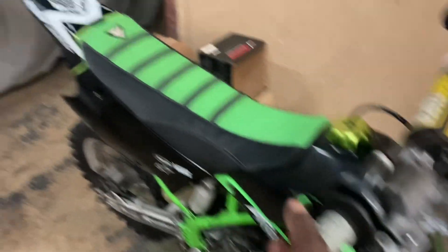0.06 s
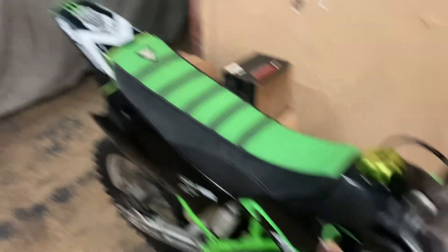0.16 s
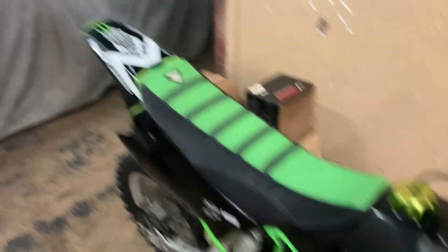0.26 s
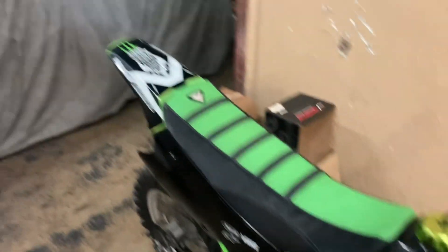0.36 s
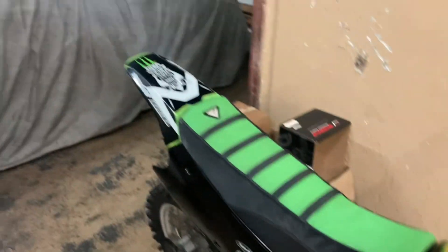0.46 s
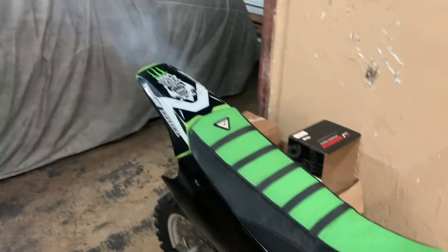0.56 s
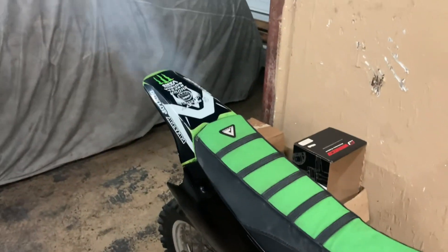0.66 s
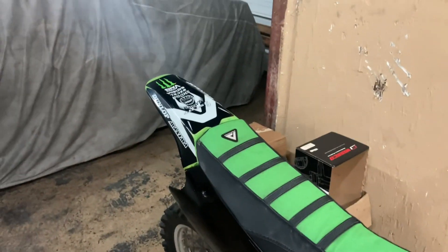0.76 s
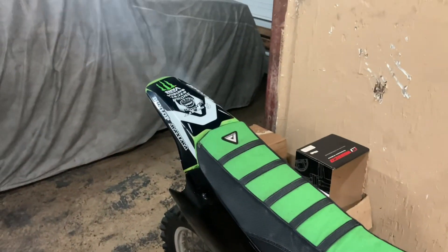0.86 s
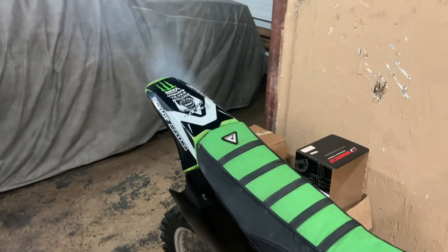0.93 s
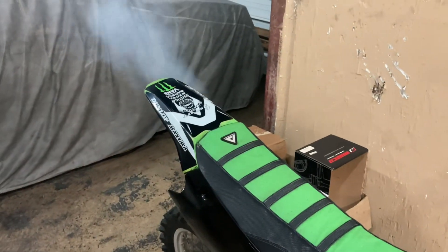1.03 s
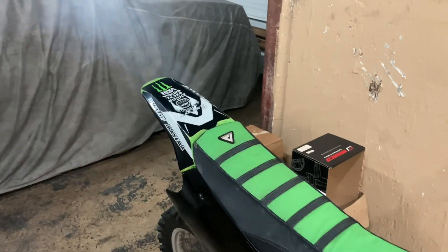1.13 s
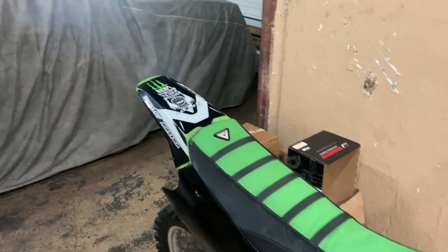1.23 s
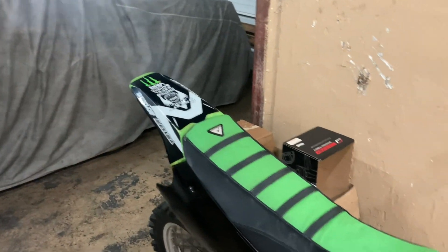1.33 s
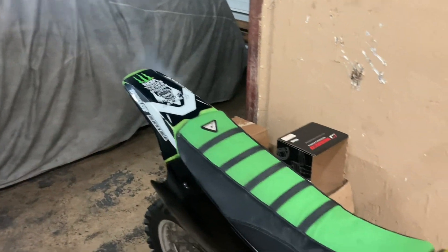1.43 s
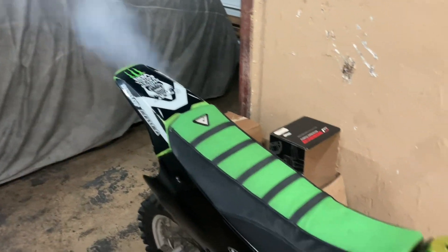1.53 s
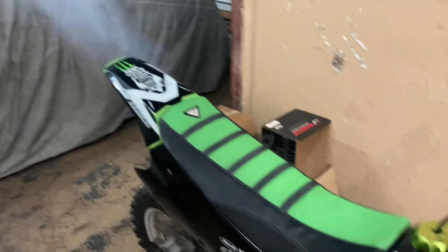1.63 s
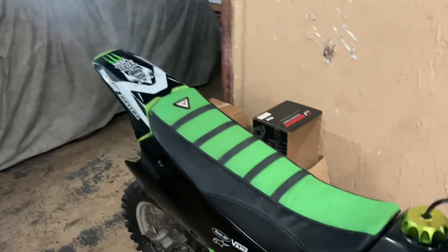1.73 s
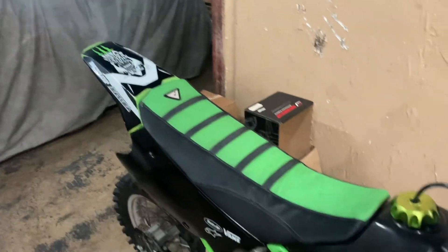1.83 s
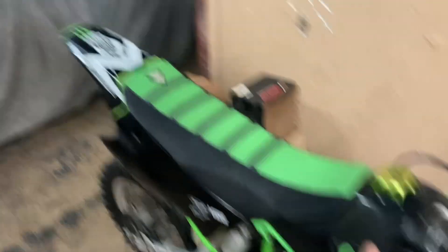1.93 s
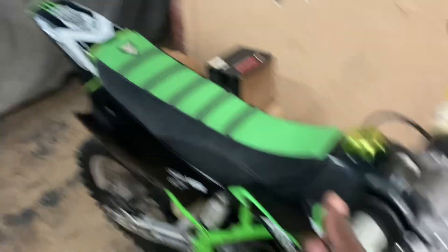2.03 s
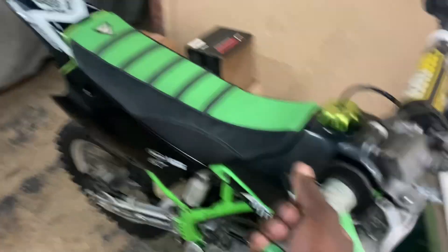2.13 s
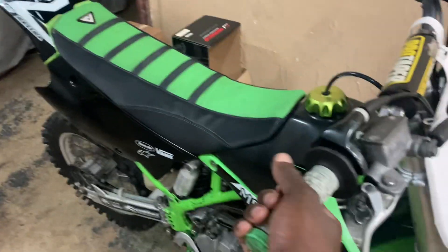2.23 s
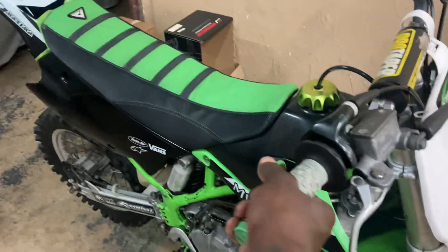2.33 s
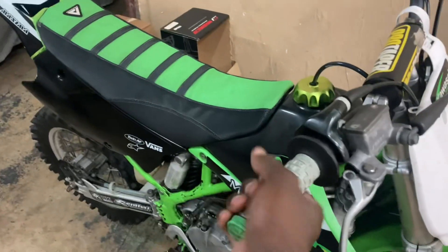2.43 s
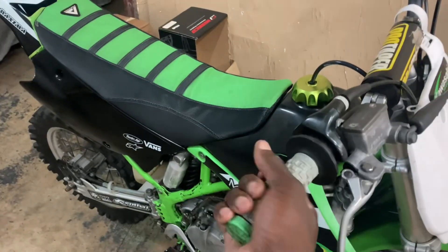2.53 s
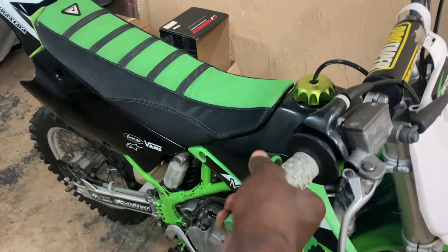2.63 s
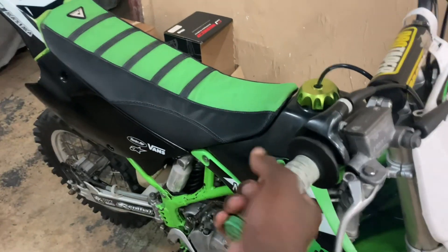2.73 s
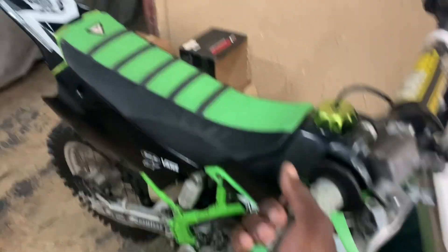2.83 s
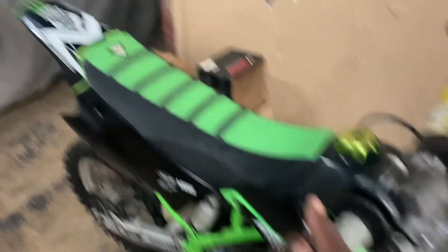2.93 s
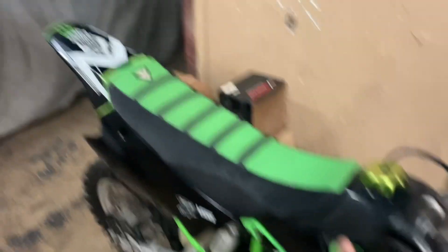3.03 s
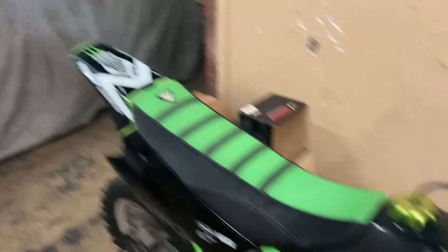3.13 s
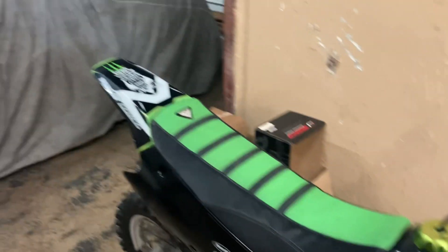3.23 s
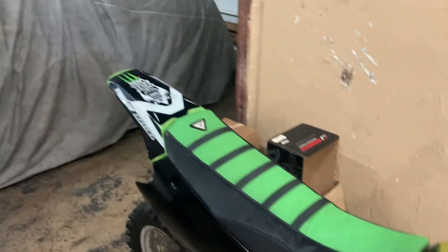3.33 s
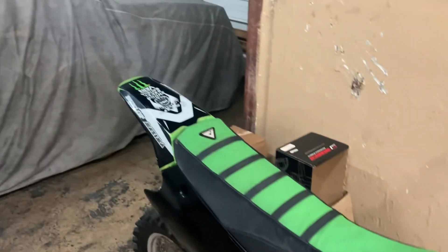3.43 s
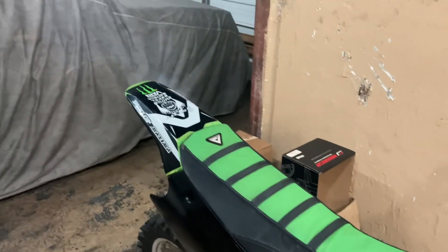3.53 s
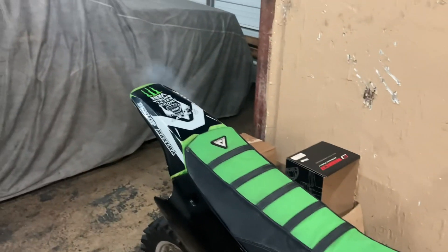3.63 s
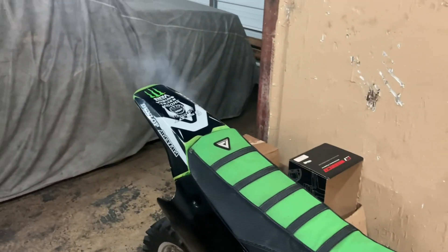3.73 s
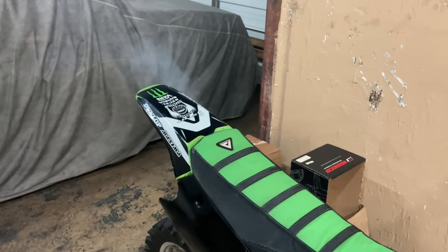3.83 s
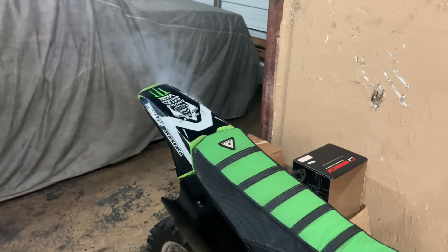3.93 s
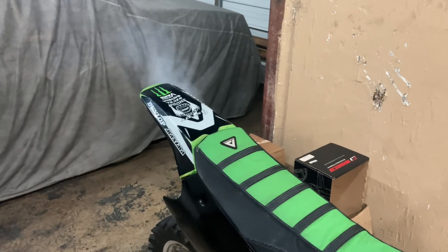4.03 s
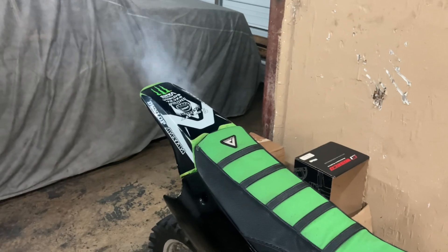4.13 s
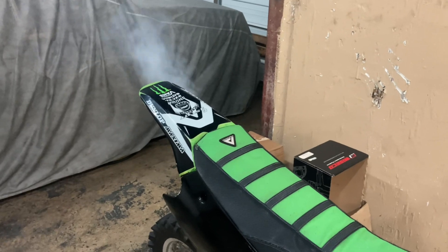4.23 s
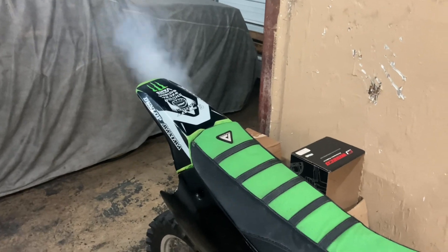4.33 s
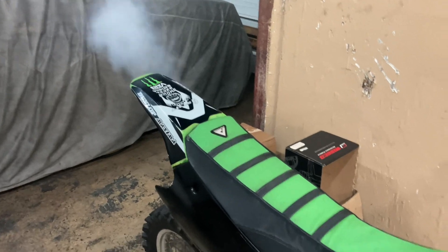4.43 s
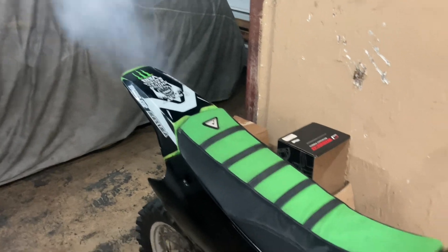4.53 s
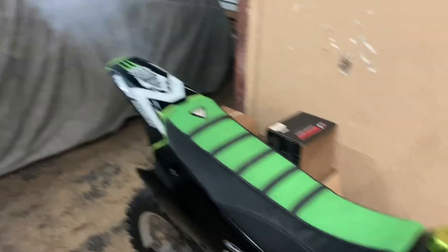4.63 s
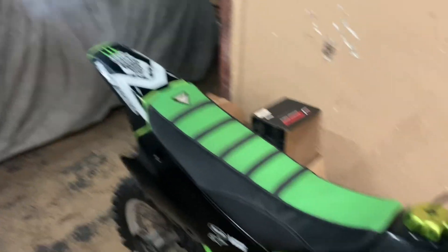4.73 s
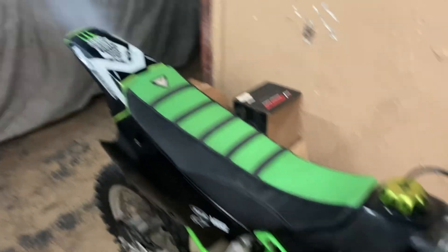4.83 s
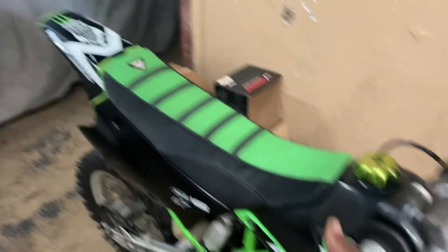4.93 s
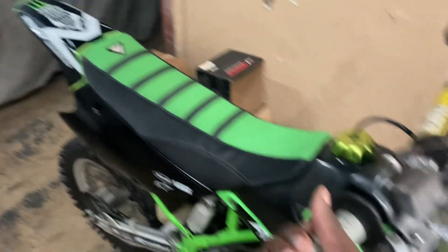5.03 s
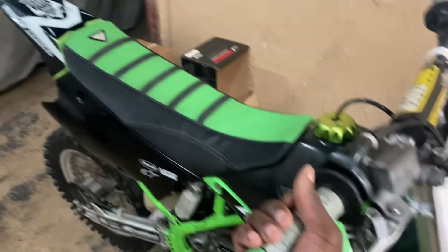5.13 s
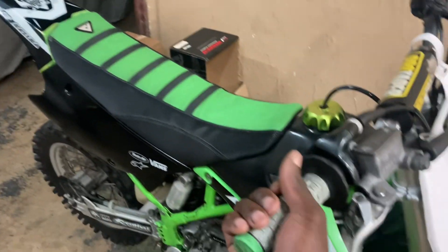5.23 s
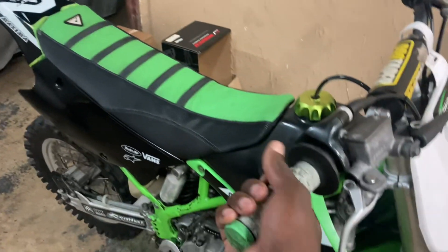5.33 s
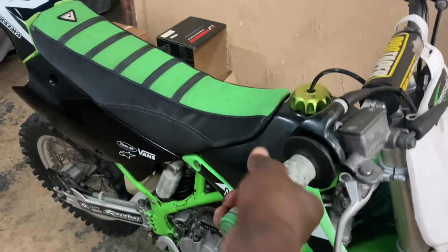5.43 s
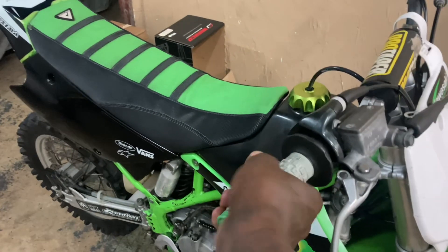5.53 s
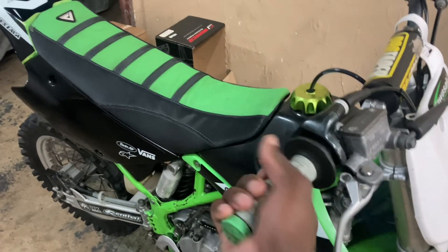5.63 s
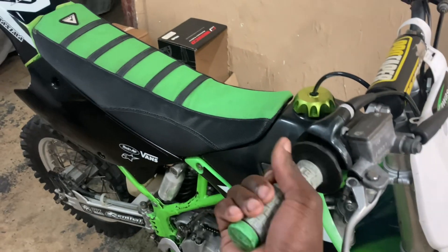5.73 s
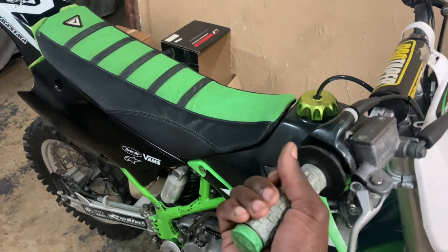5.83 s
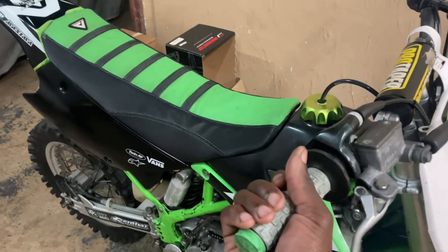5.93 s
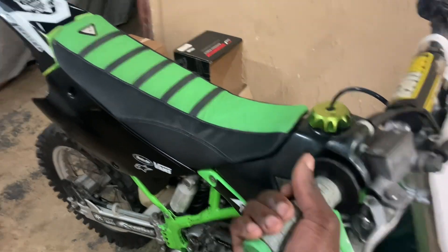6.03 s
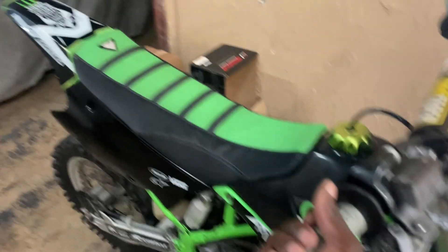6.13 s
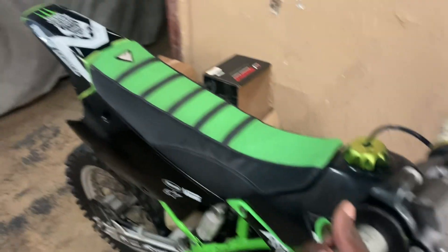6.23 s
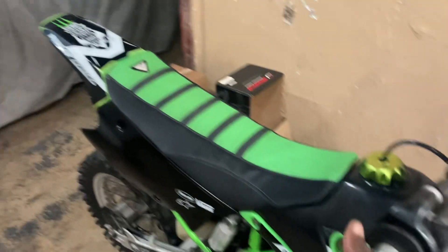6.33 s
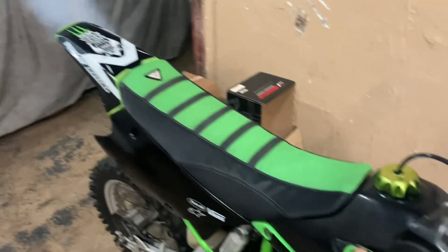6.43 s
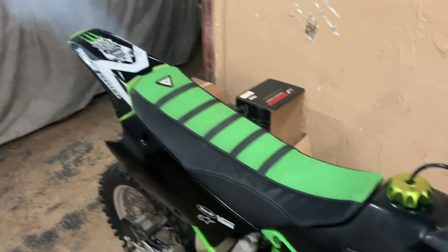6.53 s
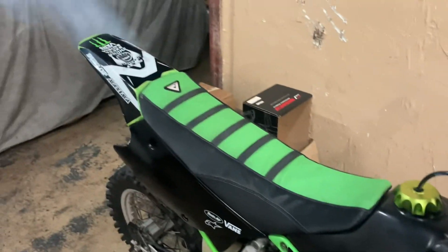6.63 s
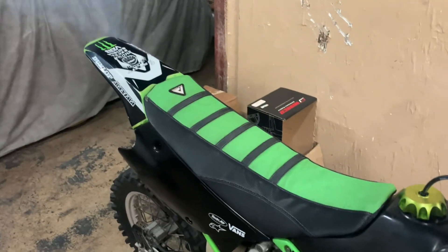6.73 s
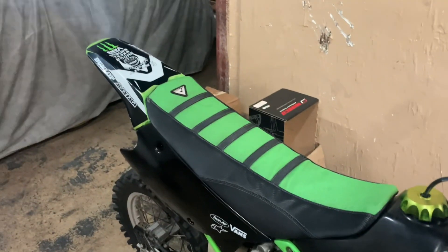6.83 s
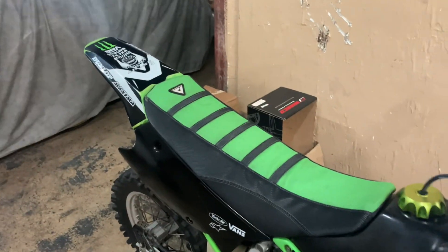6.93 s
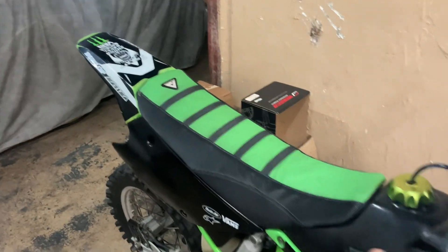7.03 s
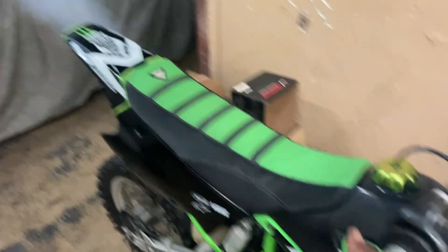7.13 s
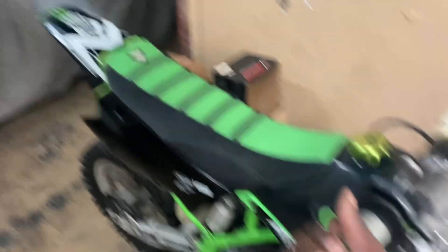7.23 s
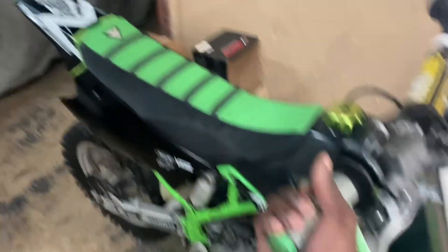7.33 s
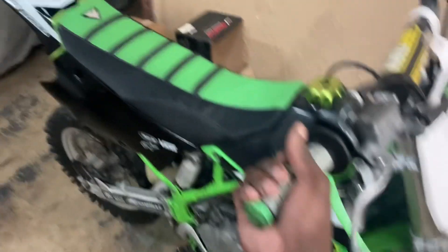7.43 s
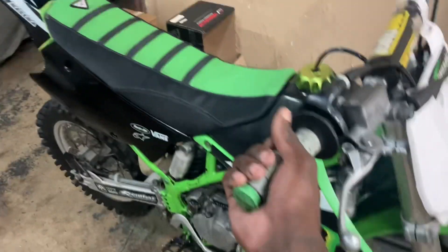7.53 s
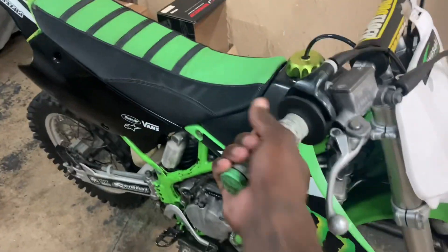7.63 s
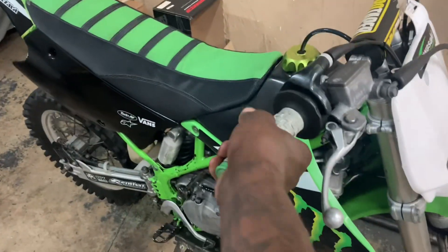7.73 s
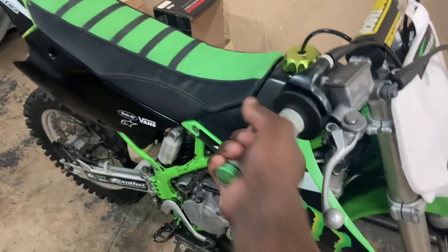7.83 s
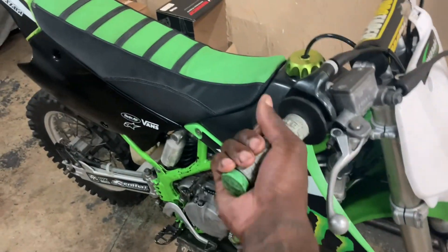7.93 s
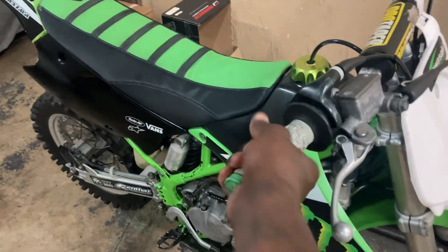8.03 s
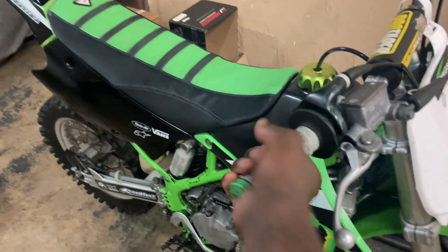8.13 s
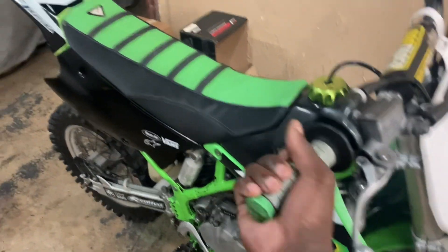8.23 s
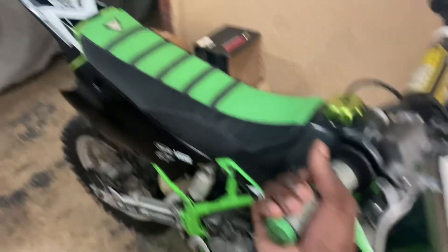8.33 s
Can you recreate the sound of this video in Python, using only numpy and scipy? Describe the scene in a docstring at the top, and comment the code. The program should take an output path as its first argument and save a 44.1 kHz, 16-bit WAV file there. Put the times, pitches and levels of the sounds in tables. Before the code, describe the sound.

A small two-stroke dirt bike engine picks up from slow puttering and is revved in sharp, raspy throttle blips inside a garage, heard up close.

```python
"""Small two-stroke dirt bike revved in a garage

The engine picks up from a slow beat and is blipped fifteen times, coasting down between blips.
Throttle open: firing pulses boom in the pipe, gas barks in the chamber and a noise jet rasps.
Throttle shut: the bark comes in uneven putts while crank overtones whine and knocked metal clatters.
A camera's microphones stand close by; the garage walls answer as short decaying noise tails."""
import sys
import numpy as np
from scipy import signal
from scipy.fft import rfft, irfft, next_fast_len
from scipy.io import wavfile
from scipy.ndimage import uniform_filter1d, map_coordinates

SR = 44100
rng = np.random.default_rng(int(sys.argv[2]) if len(sys.argv) > 2 else 0)


def generate_wav(sig):
    """Save sig (samples, or channels by samples) to the path in sys.argv[1] as 16-bit PCM at SR."""
    pcm = np.round(np.clip(np.atleast_2d(sig).T, -1, 1) * 32767).astype(np.int16)
    wavfile.write(sys.argv[1], SR, pcm)


N = 369116

# Twists of the throttle. Each row: opening time in seconds, time held in seconds, run-up in seconds,
# top speed in crank turns a second, hang at the top in seconds, ease (0 is snapped, more is rolled on),
# then peak levels in dB, before scene() trims them: boom, bark, rasp, clatter.
THROTTLE_TWISTS = [(-.03, 0.057, .11, 38.13, 0.012, 0, -18, -24.5, -42, -26.5),
                   (.075, .1, .11, 44.02, .01, 0.11, -9, -25, -27, -19.5),
                   (.19, 0.13, .13, 81.95, .05, 0, -14.5, -25.5, -26, -24),
                   (.497, 0.16, 0.15, 107.3, 0.12, 0, -12, -26.5, -22, -24),
                   (.917, 0.12, .147, 137.5, .024, 0, -13, -27.5, -20.5, -24.5),
                   (1.445, 0.14, 0.22, 168.7, .008, 0, -12.5, -25.5, -20, -23),
                   (2.297, 0.16, 0.21, 153.2, 0.012, 0.15, -16.5, -26.5, -22, -24),
                   (2.652, 0.073, 0.091, 176, 0.07, 0, -17.5, -28, -20.5, -25.5),
                   (4.3, 0.23, .22, 113.2, 0.076, 1.1, -18, -32.5, -27.5, -29),
                   (4.78, 0.18, 0.2, 153.3, 0.064, 0.21, -15.5, -25.5, -22.5, -25),
                   (5.43, .12, .158, 180.1, .112, 0.0096, -13, -25, -20.5, -22.5),
                   (6.412, 0.21, 0.23, 174.1, 0.081, 0.33, -14.5, -26, -22, -25),
                   (7.113, 0.07, 0.078, 150.2, .117, 0, -17.5, -29, -21, -25),
                   (7.7, .14, 0.18, 160.4, 0.043, 0.34, -14, -27.5, -20.5, -25),
                   (8.068, 0.081, 0.071, 171.4, 0.099, 0, -16, -28.5, -22, -25.5)]


def amp(db):
    """Decibels to gain."""
    return 10 ** (np.asarray(db) / 20)


def unit(x):
    """Scale to rms 1."""
    return x / np.sqrt(np.mean(x ** 2) + 1e-20)


def even(x, size=1800):
    """Hold the short-term rms near 1 over windows of size samples, leaving the single beats intact."""
    power = np.mean(np.atleast_2d(x) ** 2, axis=0)
    smooth_power = uniform_filter1d(uniform_filter1d(power, size), size)
    return x / np.sqrt(np.abs(smooth_power) + 1e-12)


def along(points, hz):
    """Read (Hz, value) points on a log axis."""
    f, v = np.transpose(points)
    return np.interp(np.log(hz + 1), np.log(f + 1), v)


def at_speed(rows, speed):
    """Read each column of a table at the crank's speed."""
    hz, *cols = np.transpose(rows)
    return [np.interp(speed, hz, c) for c in cols]


def wobble(rate):
    """A smooth random curve, rate knots a second."""
    knots = rng.standard_normal(int(N * rate / SR) + 4)
    return map_coordinates(knots, [np.arange(N) * rate / SR], order=2)


def filtered(x, response):
    """Multiply the spectrum of x by a response of frequency."""
    m = next_fast_len(N + SR // 2)
    return irfft(rfft(x, m) * response(np.fft.rfftfreq(m, 1 / SR)), m)[..., :N]


def coloured(x, points, size=8192):
    """Causal filter with the gain of (Hz, dB) points."""
    gain = amp(along(points, np.fft.rfftfreq(size, 1 / SR)))
    # folding the cepstrum gives minimum phase
    cepstrum = irfft(np.log(gain))
    cepstrum[1:size // 2] *= 2
    cepstrum[size // 2 + 1:] = 0
    impulse = irfft(np.exp(rfft(cepstrum)))
    return signal.oaconvolve(x, impulse[None], axes=1)[:, :N]


def resonate(x, modes):
    """Pass x through (Hz, width Hz, dB) resonances side by side."""
    def response(f):
        return sum(amp(db) * 1j * f * w / (c * c - f * f + 1j * f * w) for c, w, db in modes)
    return filtered(x, response)


def spread(pair):
    """Mix two unrelated signals to left and right, most alike in the bass."""
    # Likeness of the two channels. Each row: frequency in Hz, correlation.
    likeness = [(150, 0.81), (350, 0.84), (700, 0.25), (1400, 0.17), (2800, -0.13), (5500, 0.023),
                (9000, 0.22), (13000, -0.18)]

    def mid_side(hz):
        turn = np.arccos(np.clip(along(likeness, hz), -1, 1)) / 2
        return np.array([np.cos(turn), np.sin(turn)])
    mid, side = filtered(pair, mid_side)
    return np.array([mid + side, mid - side])


def noise():
    """White stereo turbulence."""
    return spread(rng.standard_normal((2, N)))


def garage(x, wet_db):
    """Add the walls' answer along four paths, each frequency dying at its own speed."""
    # Decay of the room. Each row: frequency in Hz, time to fall 60 dB in seconds.
    decay_times = [(150, 1), (1000, 0.083), (5000, 0.19), (14000, 0.067)]
    hz, t, z = signal.stft(rng.standard_normal((2, 2, SR // 3)), SR, nperseg=256)
    fading = z * amp(-60 * t / along(decay_times, hz)[:, None])
    tail = signal.istft(fading, SR, nperseg=256)[1]
    # the first answer comes after 5 ms
    source = np.pad(x, ((0, 0), (SR // 200, 0)))[None]
    answer = signal.oaconvolve(source, tail / np.linalg.norm(tail[0]), axes=2).sum(axis=1)
    return x + amp(wet_db) * spread(answer[:, :N])


def crank_speed():
    """Each blip runs the crank up ever faster; it hangs at the top, then drag pulls it toward idle."""
    start_hz, idle_hz = 34.88, 43.24  # turns a second
    drag_per_s, run_up_power = 1.23, 1.4
    t = np.arange(N) / SR
    speed = np.full(N, start_hz)
    for opens, _, run_up, top, hang, *_ in THROTTLE_TWISTS:
        before = np.interp(opens, t, speed)
        age = t - opens
        rising = before + (top - before) * np.clip(age / run_up, 0, 1) ** run_up_power
        coast_time = np.maximum(age - run_up - hang, 0)
        coasting = idle_hz + (top - idle_hz) * np.exp(-drag_per_s * coast_time)
        speed = np.where(age < 0, speed, np.where(age < run_up, rising, coasting))
    return uniform_filter1d(speed, size=1100)


def throttle(shut_db, peaks_db, attack_s, swell_db, drop_db, fade_db_per_s):
    """Gain of a layer: over its coasting level each blip jumps in, swells or sags, drops and fades."""
    # per unit of ease, the throttle takes this much longer to bite and starts this much lower
    ease_s, ease_db = 0.0079, 8
    t = np.arange(N) / SR
    power = amp(shut_db) ** 2
    for (opens, held, _, _, _, ease, *_), peak_db in zip(THROTTLE_TWISTS, peaks_db):
        near = (t > opens - .1) & (t < opens + 1)
        age = t[near] - opens
        still_to_swell = (swell_db + ease_db * ease) * (1 - np.clip(age / held, 0, 1))
        since_shut = np.maximum(age - held, 0)
        fallen = drop_db * np.tanh(since_shut / 0.043) + fade_db_per_s * since_shut
        bite = (1 + np.tanh(age / (attack_s + ease_s * abs(ease)))) / 2
        power[near] += (amp(peak_db - still_to_swell - fallen) * bite) ** 2
    return np.sqrt(power)


def firings(turns, load, open_db, shut_db):
    """Random strength of each turn's burn, held over that turn; its scatter in dB follows the load."""
    cycle = turns.astype(int)
    chance = np.clip(rng.standard_normal(2048)[cycle], -2, 1.5)
    return amp(chance * (open_db * load + shut_db * (1.5 - load)))


def pulses(turns):
    """One sharp pressure pulse each time the exhaust port opens."""
    offset = (turns - np.round(turns)) / np.gradient(turns)  # samples from the opening
    return even(np.sinc(offset / 2) * np.exp(-(offset / 10) ** 2))


def puffs(turns, length):
    """A gate that opens with the port and fades over a share of the turn."""
    return even(np.exp(-(turns % 1) / length))


def firing_note(turns):
    """The deep tone of one pulse a turn."""
    return np.sqrt(2) * np.sin(2 * np.pi * turns) * amp(1.56 * wobble(22))


def boom(turns, speed, load):
    """Overtones swell as they glide through the pipe's resonances; uneven burns add a burble."""
    # Exhaust pipe and silencer, low range. Each row: frequency in Hz, relative gain in dB.
    pipe = [(25, -39), (60, -32), (100, -27.5), (135, -17.5), (170, -12.5), (215, -8), (250, 1), (285, -4),
            (325, -1), (375, -8.5), (420, -13.5), (465, -8), (560, -32), (700, -56.5)]
    # Overtones of the exhaust note. Each row: multiple of crank speed, then
    # weights in dB for the throttle shut and for load, blended by the load.
    overtones = [(2, -0.5, 3), (3, -6.5, 0), (4, -5, -1)]
    note = 0
    for k, shut_db, open_db in overtones:
        level_db = along(pipe, k * speed) + shut_db * (1.5 - load) + open_db * load
        level = amp(level_db + 5.9 * wobble(24))
        note = note + level * np.sin(2 * np.pi * (k * turns + rng.random()))
    burns = firings(turns + .5, load, open_db=2.5, shut_db=4.5)
    # at a crawl the single pops stand apart
    crawl = np.clip((74 - speed) / 22, 0, 1)
    gas = noise() * puffs(turns, length=0.78) * amp(-2) * (1 - crawl) ** 2
    pops = pulses(turns) * (burns - 1 + crawl * 2) + gas
    burble = even(garage(coloured(pops, pipe), wet_db=-9))
    # with little load, the burble comes forward at high speed and near idle
    fast, slow = np.clip((speed - 130) / 30, 0, 1), np.clip((105 - speed) / 20, 0, 1)
    forward = (fast + .8 * slow) * (1 - load)
    lurch = amp(3.5 * (1 - load) * wobble(22))
    return even(even(note) * (1 - crawl) + burble * amp(-11 + 18 * crawl + 19 * forward)) * lurch


def bark(turns, load):
    """Pulses and gas ring the chamber; shut, the throttle leaves uneven putts."""
    # Resonances of the chamber and cases. Each row: frequency in Hz, width in Hz, relative gain in dB.
    chamber = [(465, 60, -3), (530, 70, -4), (680, 130, -1), (880, 150, -3), (1110, 180, -4),
               (1290, 160, -4)]
    beat = even(pulses(turns) * firings(turns + .5, load, open_db=-3.5, shut_db=12))
    gas = noise() * puffs(turns, length=0.58) * amp(9.5 - 8.6 * load)

    def skirts(hz):
        return 1 / (1 + (380 / (hz + 1)) ** 8) / (1 + (hz / 1550) ** 8)
    return even(garage(filtered(resonate(beat + gas, chamber), skirts), wet_db=0))


def ticking(turns, speed, count=28):
    """Crank overtones heard through the engine cases: a comb of gliding lines, fluttering at speed."""
    # How the cases pass the crank's overtones. Each row: frequency in Hz, relative gain in dB.
    case_gain = [(380, -19), (470, -31), (570, 12.5), (680, 6), (770, -1), (880, 10.5), (990, 1.5),
                 (1110, 6), (1280, -1), (1480, -0.5), (1750, -8.5), (2600, -4.5), (3300, -7)]
    shaft = turns + .005 * wobble(60)
    flutter = speed / 125
    comb = np.zeros((2, N))
    for k in range(6, count):
        # at speed each overtone flutters and reaches the two ports by its own mix of paths
        size = amp(along(case_gain, k * speed) + 4.5 * flutter * wobble(14))
        skew = .7 * flutter * wobble(7)
        smear = 1.1 * rng.standard_normal()
        comb += size * np.cos(2 * np.pi * k * shaft + smear + np.array([skew, -skew]))
    return even(comb)


def whine(turns):
    """Clean high orders of the crank, led by the fifth, wavering a little."""
    # Whine of the engine. Each row: multiple of crank speed, relative level in dB.
    crank_orders = [(5, -3.5), (7, -17.5)]
    shaft = turns + .007 * wobble(45)
    orders = 0
    for k, db in crank_orders:
        orders = orders + amp(db + 5.9 * wobble(18)) * np.sin(2 * np.pi * (k * shaft + rng.random()))
    return even(garage(np.array([orders, orders]), wet_db=-9))


def clatter(turns, load):
    """Metal is knocked once a turn; the pipe shell rings out more strongly under load."""
    # Colour of the rattling metal. Each row: frequency in Hz, relative gain in dB.
    metal_colour = [(700, -31), (1480, 4), (1800, -1), (2500, 0.5), (2750, 0), (3250, -3.5), (4050, -2),
                    (4700, -7.5), (5600, -9.5), (9000, -22.5)]
    # Ringing of the cylinder and pipe shell. Each row: frequency in Hz, width in Hz, relative gain in dB.
    shell_modes = [(2993, 18, 10), (3158, 55, 8.5), (3405, 37, 9), (3810, 34, 3), (4340, 45, -12),
                   (4580, 22, 8)]
    hits = noise() * puffs(turns, length=0.93) + amp(-22.5) * pulses(turns)
    knocks = hits * firings(turns + 0.13, load, open_db=6.5, shut_db=-0.5)
    shell = unit(resonate(knocks, shell_modes)) * amp(-11.5 + 6.7 * load)
    return even(garage(unit(coloured(knocks, metal_colour)) + shell, wet_db=1))


def rasp(turns, load):
    """Each burn shoots out a hissing jet; thin metal sings along as the load falls."""
    # Colour of the gas jet. Each row: frequency in Hz, relative gain in dB.
    jet_colour = [(1500, -59), (3200, 3.5), (4600, 1), (5500, -2), (6600, -4.5), (8100, 4.5), (9200, -2),
                  (11200, 1.5), (12400, -6), (14600, -6.5), (16000, -8.5)]
    # Thin metal that sings. Each row: frequency in Hz, width in Hz, relative gain in dB.
    thin_metal = [(4740, 130, 7), (8450, 110, 2.5)]
    bursts = puffs(turns, length=1.0) * firings(turns, load, open_db=1.5, shut_db=2.0)
    jet = noise() * (bursts + 0.19 * (1 - load))
    zing = unit(resonate(jet, thin_metal)) * amp(-13) * (1 - load)
    return even(garage(unit(coloured(jet, jet_colour)) + zing, wet_db=1))


def scene():
    """All layers follow one crank and one throttle; the load is high where the crank gains speed."""
    # Tones with the throttle shut, swelling as the speed passes resonances. Each row: crank speed
    # in turns a second, then levels in dB before the trims below: firing note, pipe boom, whine.
    coast_tones = [(45, -49, -36, -33), (66, -55, -38, -58), (79, -43, -40.5, -49), (99, -42.5, -39, -66),
                   (107.3, -48, -30, -49), (115.4, -42.5, -28.5, -35.5), (123.8, -38.5, -24.5, -41),
                   (128.2, -37, -25.5, -33.5), (139, -36.5, -39.5, -32), (141.7, -30.5, -32.5, -42),
                   (154, -50, -37, -52), (180.3, -31, -33, -38.5)]
    # Noises with the throttle shut. Each row: crank speed in turns a second, then levels in dB
    # before the trims below: bark, rasp, clatter.
    coast_noises = [(65.44, -41.5, -60, -47), (101, -36.5, -53, -41.5), (116.8, -36, -46.5, -38),
                    (142.6, -36, -38.5, -34.5), (140, -35, -43.5, -37.5), (168, -46, -32.5, -49.5)]
    speed = crank_speed()
    turns = .2 + np.cumsum(speed * (1 + 0.002975 * wobble(35))) / SR
    speed_growth = uniform_filter1d(np.gradient(np.log(speed)) * SR, size=1500)
    load = np.clip(0.37 + speed_growth / 4.4, 0, 1)
    note_db, boom_db, whine_db = at_speed(coast_tones, speed)
    bark_db, rasp_db, clatter_db = at_speed(coast_noises, speed)
    *_, booms, barks, rasps, clatters = np.transpose(THROTTLE_TWISTS)

    push = throttle(boom_db - .9, booms - 1.6, attack_s=0.031, swell_db=-3.0, drop_db=5.5,
                    fade_db_per_s=69)
    deep = firing_note(turns) * amp(note_db) * (push / amp(boom_db)) ** 0.4 * amp([[1], [-1]])
    low = boom(turns, speed, load) * push * amp([[.3], [-.3]])

    # the midrange turns ragged under load, at a crawl and at the top of a rev
    ragged_by_speed = np.interp(speed, [50, 62, 90, 130, 165], [.85, .5, .35, .25, .6])
    ragged = np.clip(.3 * load + ragged_by_speed, 0, .95)
    middle = np.sqrt(ragged) * bark(turns, load) + np.sqrt(1 - ragged) * ticking(turns, speed)
    middle *= throttle(bark_db + 2.0, barks + 5.2, attack_s=0.019, swell_db=4, drop_db=4.5,
                       fade_db_per_s=28.5)

    singing = whine(turns) * amp(whine_db + 1 + 3.8 * load)
    metal = clatter(turns, load) * throttle(clatter_db + 1.1, clatters + 0.58, attack_s=.008,
                                            swell_db=3.5, drop_db=2, fade_db_per_s=37)
    hiss = rasp(turns, load) * throttle(rasp_db + 4.0, rasps + 5, attack_s=0.0049,
                                        swell_db=6, drop_db=0.5, fade_db_per_s=106)
    # everything above the boom flutters together
    upper = (middle + singing + metal + hiss) * amp(0.87 * wobble(22))

    port_lag_s = 0.0002  # the low exhaust tones reach the left port later

    def lag(hz):
        return np.exp(1j * np.pi * port_lag_s * np.array([-hz, hz]))
    return upper + filtered(deep + low, lag)


def record(dry):
    """The camera rounds the tallest peaks, has two narrow dips in the treble and a steep band limit."""
    # The camera's treble dips. Each row: frequency in Hz, width in Hz, depth in dB.
    treble_dips = [(9827, 261, -73), (12900, 240, -44)]
    top_hz = 15900
    rounded = dry / (1 + np.abs(dry / .92) ** 8) ** (1 / 8)

    def response(hz):
        dips_db = sum(db * np.exp(-((hz - c) / w) ** 2) for c, w, db in treble_dips)
        return amp(dips_db) * (hz < top_hz)
    return filtered(rounded, response)


dry = scene()
out = record(dry)
generate_wav(out)
```